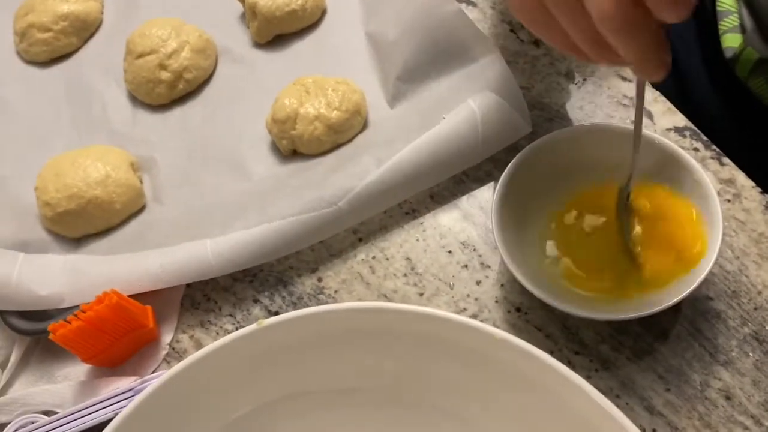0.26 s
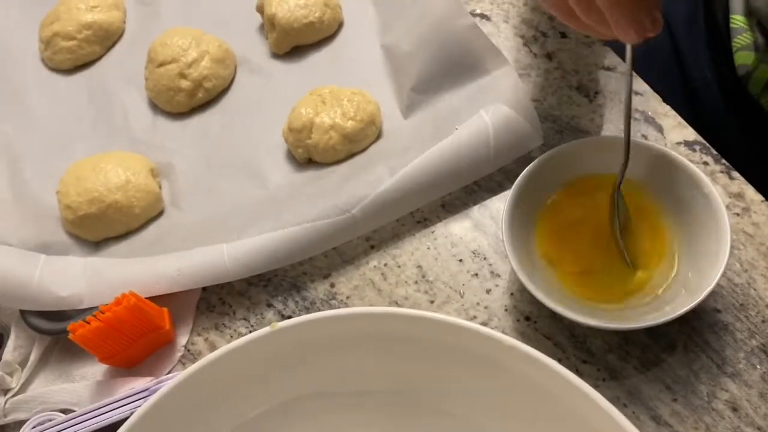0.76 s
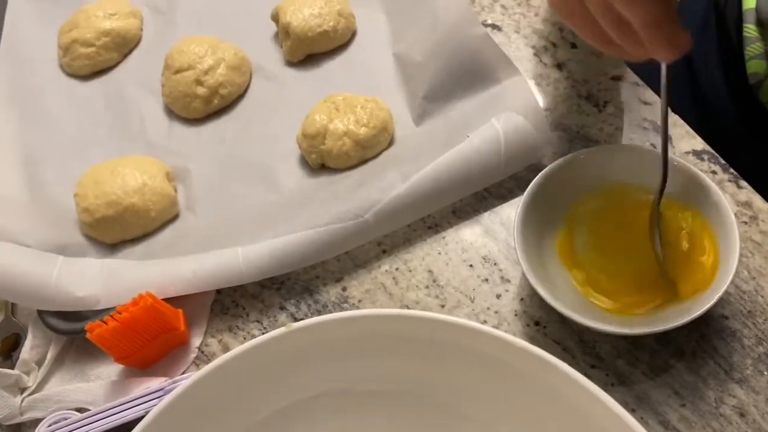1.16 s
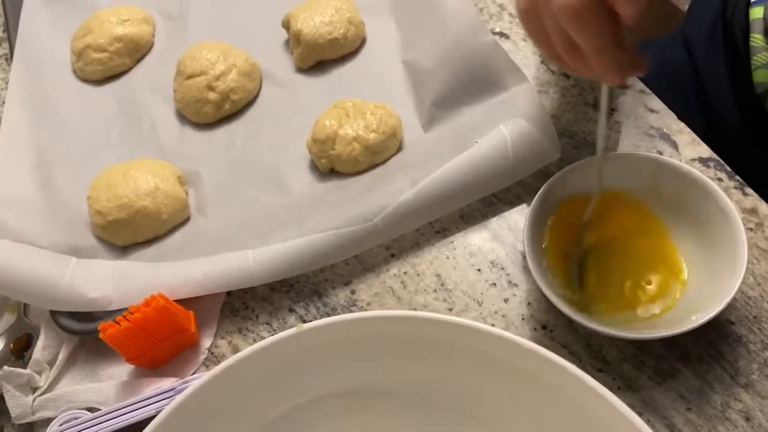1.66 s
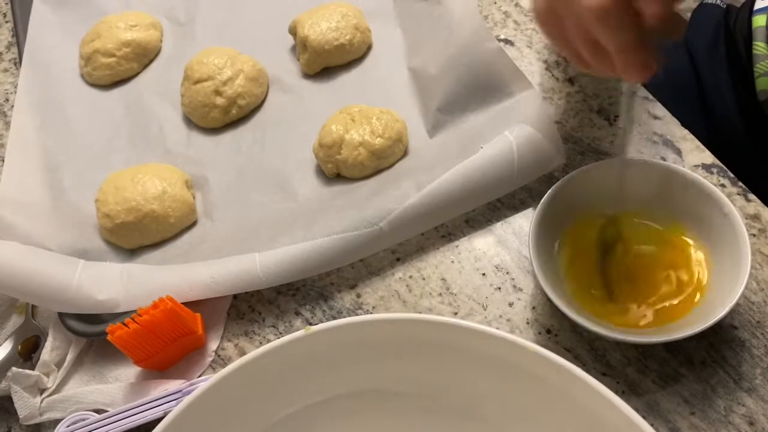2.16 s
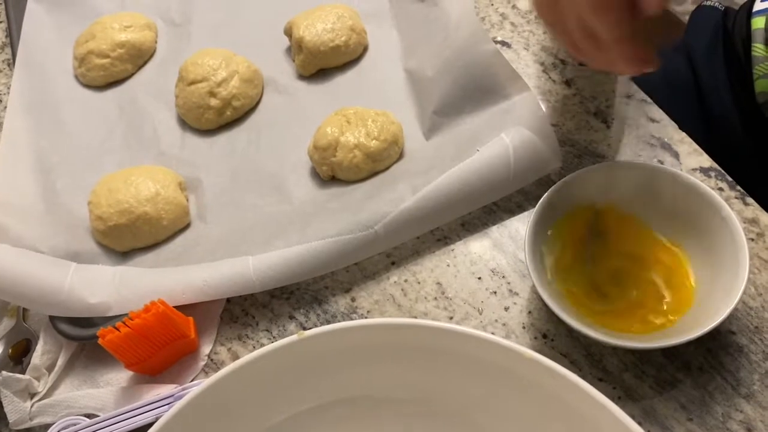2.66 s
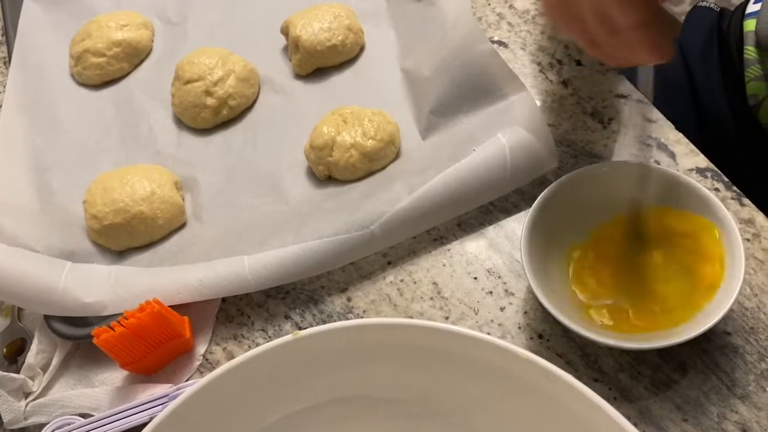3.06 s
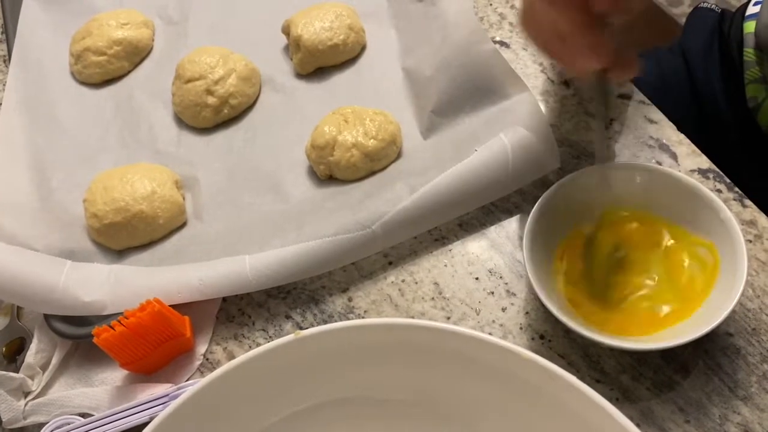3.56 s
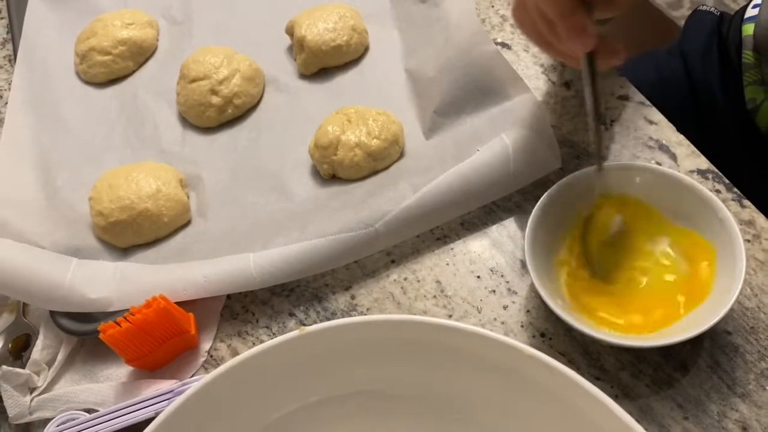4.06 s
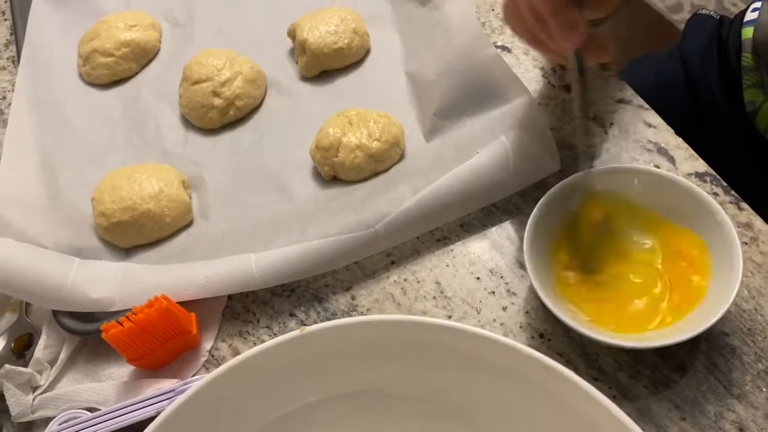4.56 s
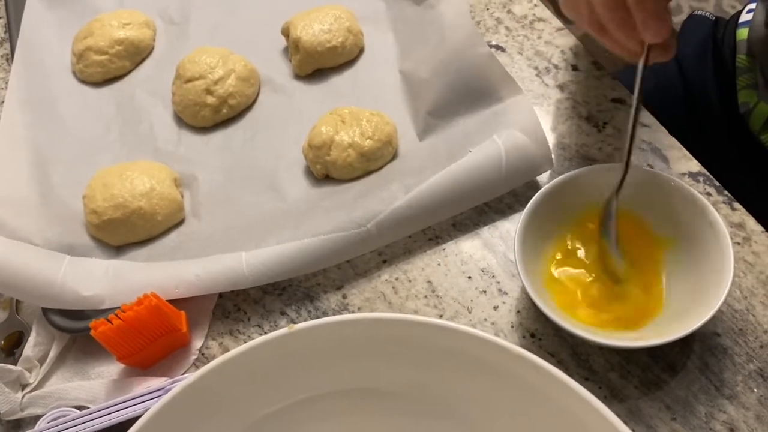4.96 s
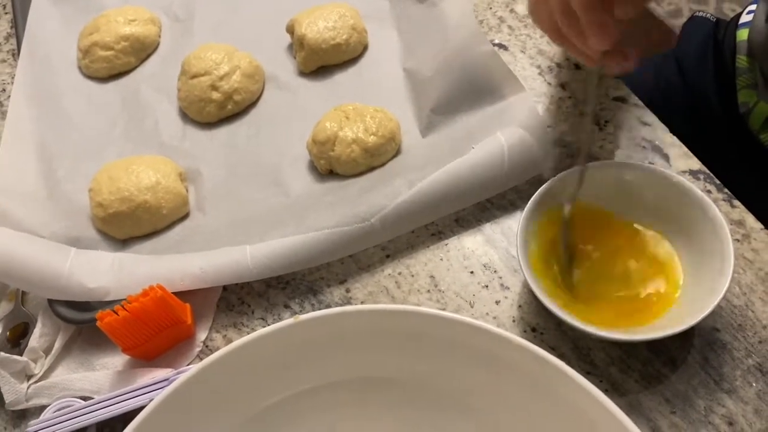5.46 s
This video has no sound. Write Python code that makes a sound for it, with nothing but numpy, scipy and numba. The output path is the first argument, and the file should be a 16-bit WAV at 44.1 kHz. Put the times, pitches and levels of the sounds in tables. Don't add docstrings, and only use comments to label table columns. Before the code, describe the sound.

A steel spoon beats egg in a small ceramic bowl, heard close on a handheld phone in a small, hard kitchen. From 0.2 s clinks fall roughly every quarter second, uneven in force: each is a dry bright crack with a short egg-damped spoon ring and a longer, fluttering bowl ring around 2 and 5 kHz. Hits near 0.8, 1.15 and 1.5 s are very loud and clip. From 1.7 s short scraping strokes join each clink; between 2.4 and 3.3 s clinks are lighter and scraping is more continuous. A firmer clink comes at 3.4 s and a sharp tiny snap at 3.6 s, then mostly soft rubbing until 4.8 s, with a moderate clink at 4.4 s. A light tap at 4.9 s precedes the hardest, overloaded clang at 5.2 s; a last clink and scrape follow at 5.55 s. Faint fridge hum, hush and deep air sway continue throughout.

```python
import sys
import numpy as np
from scipy import signal
from scipy.fft import rfft, irfft
from scipy.io import wavfile
from scipy.ndimage import uniform_filter1d
from numba import njit

SR = 44100
rng = np.random.default_rng(int(sys.argv[2]) if len(sys.argv) > 2 else 0)


def gain_from_db(level_db):
    decades = np.asarray(level_db, float) / 20
    return 10 ** decades


def persist_wave(psi):
    counts = np.round(np.clip(psi, -1, 1) * 32767).astype(np.int16)
    wavfile.write(sys.argv[1], SR, np.atleast_2d(counts).T)


N = 250929


def colour(x, points):
    hz, db = np.transpose(points)
    f = np.maximum(np.fft.rfftfreq(4096, 1 / SR), 1)
    cepstrum = irfft(np.interp(np.log(f), np.log(hz), db) * np.log(10) / 20)
    cepstrum[1:2048] *= 2
    cepstrum[2049:] = 0
    return signal.fftconvolve(x, irfft(np.exp(rfft(cepstrum))))[:len(x)]


def butter(x, order, hz, kind):
    return signal.sosfilt(signal.butter(order, hz, kind, fs=SR, output="sos"), x)


def unit(x):
    return x / np.sqrt(np.mean(x ** 2))


def walk(size):
    steps = uniform_filter1d(rng.standard_normal(2 * N // size + 2), size=2)
    return 2.36 * np.interp(np.arange(N), np.arange(len(steps)) * size / 2, steps)


@njit
def resonate(x, hz, width_hz):
    y, first, second, pole = np.empty(len(x)), 0j, 0j, 0j
    for i in range(len(x)):
        if i % 32 == 0:
            pole = np.exp(np.pi * (2j * hz[i] - width_hz) / SR)
        first = first * pole + x[i]
        second = second * pole + first
        y[i] = second.imag
    return y


def ring(hz, db, t60_s, phase=0):
    t = np.arange(SR // 2) / SR
    return gain_from_db(db) * np.sin(2 * np.pi * hz * t + phase) * np.exp(-np.log(1000) * t / t60_s)


def add(out, s, sound):
    i = int(s * SR)
    out[i:i + len(sound)] += sound[:N - i]


# f/Hz, level/dB per Hz
HUSH = [(25, -92.5), (40, -69), (65, -79.5), (100, -77.5), (200, -79.5), (400, -77.5), (800, -86.5),
        (1600, -90.5), (3200, -100), (6400, -107), (12000, -110), (15500, -111)]
# f/Hz, level/dB rms
FRIDGE = [(84, -56), (120, -55.5), (240, -65)]
# t/s, level/dB
SWAY = [(0, -24), (.3, -19), (.5, -26), (3.6, -26), (4.3, -21), (4.6, -26), (5.4, -25), (5.69, -34)]


def background():
    t, f = np.arange(N) / SR, np.maximum(np.fft.rfftfreq(N, 1 / SR), 1)
    hz, per_hz_db = np.transpose(HUSH)
    shape = gain_from_db(np.interp(np.log(f), np.log(hz), per_hz_db)) * np.sqrt(SR / 2)
    hush = irfft(rfft(rng.standard_normal(N)) * shape, N)

    waver_db = unit(uniform_filter1d(rng.standard_normal(N), 8000))
    hum = sum(gain_from_db(db + waver_db) * np.sqrt(2) * np.sin(2 * np.pi * hz * t) for hz, db in FRIDGE)

    sway = irfft(rfft(rng.standard_normal(N)) * (f > 2) / (1 + (f / 15) ** 6), N)
    sway_db = uniform_filter1d(np.interp(t, *np.transpose(SWAY)), SR // 10)
    return hush + hum + gain_from_db(sway_db) * unit(sway)


# f/Hz, t60/s
KITCHEN_T60 = [(150, 0.49), (700, 0.52), (1900, 0.3), (3500, 0.38), (7000, 0.29), (12000, 0.21),
               (15000, .08)]


def kitchen(x):
    level_db = -12
    t, tail = np.arange(SR // 2) / SR, 0
    hz, t60_s = np.transpose(KITCHEN_T60)
    for f in 100 * 2 ** np.arange(0, 7.5, .5):
        band = butter(rng.standard_normal(len(t)), 2, [f / 2 ** .25, f * 2 ** .25], "band")
        tail = tail + band * np.exp(-np.log(1000) * t / np.interp(np.log(f), np.log(hz), t60_s))
    tail *= np.clip((t - .002) / 0.002, 0, 1)
    return gain_from_db(level_db) * signal.fftconvolve(x, tail / np.sqrt(np.sum(tail ** 2)))[:N]


# t/s, f/Hz, level/dB, t60/s, start phase/turns
JOLTS = [
    (0, 7.6, -10, 1.2, -.25),
    (1.85, 40, -36, .3, 0),
]


def hand_jolts():
    out = np.zeros(N)
    for s, hz, db, t60_s, turns in JOLTS:
        add(out, s, ring(hz, db, t60_s, 2 * np.pi * turns) * np.hanning(SR)[SR // 2:])
    return out


# t/s, peak level/dB
TICKS = [
    (1.649, -16),
    (3.613, -9),
    (4.5156, -24),
    (4.579, -20.5),
    (4.618, -23),
]


def ticks():
    out, t = np.zeros(N), np.arange(400) / SR
    for s, db in TICKS:
        snap = signal.lfilter([1, -.8], 1, rng.standard_normal(400))
        add(out, s, gain_from_db(db - 20.5) * snap * np.exp(-t / 0.0014))
    return out


def drag_mode(drive, judder, hz, width_hz, db):
    catches = rng.standard_normal(N) * rng.exponential(size=N) * judder * drive
    catches *= gain_from_db(db + 2.6 * walk(size=1400))
    hz = hz * (1 + .009 * walk(size=1500))
    return resonate(catches, hz, 0.99 * width_hz) * width_hz ** 1.583 / SR


# t/s, length/s, blade pressure level/dB, tip pressure level/dB, blade f/Hz
STROKES = [(0.017, 0.08, -38, -42, 1920), (0.224, 0.053, -32.5, -67, 1790), (1.54, 0.078, -45, -65, 1960),
           (1.741, 0.071, -26, -55, 1770), (1.981, 0.048, -27.5, -47, 1810),
           (2.222, 0.059, -29.5, -54, 1756), (2.43, 0.1, -26.5, -44.5, 1865),
           (2.673, 0.11, -27.5, -49.5, 1836), (2.872, 0.031, -33, -44, 1924),
           (2.933, 0.12, -26.5, -50, 1900), (3.104, 0.046, -33, -41.5, 1830),
           (3.181, 0.12, -25, -52.5, 1830), (3.428, 0.067, -33.5, -53.5, 1766),
           (3.505, 0.11, -40.5, -52, 1865), (3.64, 0.1, -28.5, -48.5, 1843), (3.746, 0.07, -39, -67, 1740),
           (3.795, 0.094, -50, -48.5, 1760), (3.888, 0.098, -30.5, -51, 1805),
           (4.01, 0.088, -43.5, -49.5, 1850), (4.125, 0.093, -44, -61, 1904),
           (4.246, 0.099, -47.5, -49, 1850), (4.391, 0.089, -31.5, -52.5, 1750),
           (4.639, 0.13, -35, -51.5, 1810), (5.555, 0.089, -28, -56, 1680)]
# f/Hz, width/Hz, level/dB
DRAG_LOW = [(1065, 128, -13.5), (1292, 71, -17.5), (2017, 270, -16)]
DRAG_MID = [(2730, 100, -3), (3190, 170, -3), (3950, 200, -7), (4800, 250, -12), (5035, 40, -17)]
DRAG_TOP = [(6600, 140, -7), (7050, 220, -2), (7800, 200, 0), (9500, 280, -10), (10100, 280, -8),
            (11300, 220, -11), (11850, 280, -6), (12400, 350, -10), (13300, 450, -12), (14900, 500, -13)]
# t/s, f/Hz
NECK_DRY = [(0, 3870), (3.95, 3950), (4.01, 3620), (4.12, 4130), (4.24, 3430), (4.4, 3820), (4.64, 3650),
            (5.5, 3840)]


def scrape():
    neck_deep_hz, dive, dive_span = 3180, 0.722, 0.087
    press, blade_hz, neck_hz = np.zeros((3, N)), np.full(N, 1800.), np.full(N, float(neck_deep_hz))
    for s, length_s, blade_db, tip_db, hz in STROKES:
        middle_db = -26 + 0.25 * blade_db + 0.29 * tip_db
        press_db = np.array((blade_db, middle_db, tip_db))
        i, u = int(s * SR), np.arange(int(length_s * SR)) / (length_s * SR)
        press[:, i:i + len(u)] += gain_from_db(press_db)[:, None] * np.sin(np.pi * u ** 1.28) ** 0.69
        blade_hz[i:] = hz
        neck_hz[i:] = neck_deep_hz
        rise_hz = np.interp(s, *np.transpose(NECK_DRY)) - neck_deep_hz
        neck_hz[i:i + len(u)] += rise_hz / (1 + np.exp((u - dive) / dive_span))

    judder = gain_from_db(0.9 * walk(size=200))
    sound = drag_mode(press[0], judder, blade_hz, 120, 0)
    sound += drag_mode(press[0], judder, 1.07 * blade_hz, 140, -6)
    sound += drag_mode(press[0], judder, .93 * blade_hz, 120, -6)
    sound += drag_mode(press[1], judder, neck_hz, 150, 0)
    for drive, modes in zip(press, (DRAG_LOW, DRAG_MID, DRAG_TOP)):
        for hz, width_hz, db in modes:
            sound += drag_mode(drive, judder, hz, width_hz, db)
    grit = butter(rng.standard_normal(N) * judder * (press[1] + press[2]), 2, 2500, "high")
    return gain_from_db(-33.0) * sound + gain_from_db(-9.5) * grit


# f/Hz, level/dB per Hz
CRACK = [(150, -48.5), (400, -15.5), (1000, -7.5), (1800, 5), (3000, -7), (5000, -9.5), (6000, -18),
         (7800, -8), (10000, -23.5), (12500, -33.5), (14000, -35), (16000, -34)]


def crack(peak_db, rim_db):
    t = np.arange(SR // 4) / SR
    hz, db = np.transpose(CRACK)
    tilt_db_oct = -0.41 - 0.1473 * peak_db + 0.048 * rim_db
    body_db = 0.48 * rim_db * np.exp(-(np.log2(hz / 2900) / .4) ** 2)
    shape = np.transpose([hz, db + tilt_db_oct * np.log2(hz / 2000) + body_db])
    decay = np.exp(-t / 0.0071) + 0.43 * np.exp(-t / 0.00056) + 0.033 * np.exp(-t / 0.0067)
    noise = colour(rng.standard_normal(len(t)) * decay, shape)
    noise = butter(noise, 4, 230, "high")
    return gain_from_db(peak_db - 12.5) * noise / np.abs(noise).max()


def thud(peak_db):
    db = -39 + 0.81 * peak_db
    low, high = rng.standard_normal(2)
    return ring(440 + 30 * low, db, .055) + ring(670 + 40 * high, db, .055)


# f/tip f, level/dB, t60/s
TIP = [(1.0, 3.5, 0.051), (1.014, -12.5, 0.011), (.982, -7.5, 0.044), (.83, -12, 0.033), (.885, -11, 0.045),
       (.49, -15.5, 0.065), (.34, -24.5, 0.026), (.41, -31, .035), (.69, -20, .03)]
# f/Hz, level/dB, t60/s
EDGE = [(9400, 0, .035), (10050, -3, .025), (11900, -4, .03), (12450, -3, .03), (13300, -6, .02),
        (14200, -6, .02)]


def spoon(peak_db, spoon_db, rim_db, tip_hz):
    tip_db = peak_db + spoon_db
    edge_db = peak_db + max(-16 + 0.6 * spoon_db, -32.5)
    blade_db = -16.5 + 0.3 * peak_db + 0.23 * spoon_db - .05 * rim_db
    blade_hz = 1760 + 0.98 * (tip_hz - 7900) - 7 * rim_db
    sound = ring(blade_hz, blade_db + 0.5, .045)
    sound += ring(4860 + 60 * rng.standard_normal(), tip_db - 12, .05)
    for k, (multiple, db, t60_s) in enumerate(TIP):
        spot_db = (k > 0) * 3 * rng.standard_normal()
        sound += ring(multiple * tip_hz, db + tip_db + spot_db, t60_s)
    for hz, db, t60_s in EDGE:
        sound += ring(hz * (1 + 0.0038 * rng.standard_normal()), db + edge_db - 4, t60_s)
    return sound


# f/Hz, level/dB, t60/s, group (0 low, 1 middle, 2 high)
WALL = [(2043, 0, .29, 0), (2066, -15, .15, 0), (1278, -22, .2, 0), (2630, -14, .14, 0), (5032, 0, .35, 1),
        (5070, -13, .2, 1), (4900, -13, .12, 1), (7176, -1, .28, 2), (6690, -3, .3, 2), (8915, -1, .24, 2),
        (9390, -9, .2, 2), (9862, -6, .22, 2), (11530, -11, .2, 2), (13500, -18, .15, 2)]
WALL_DB = (-36, -56, -73)


def bowl_wall(peak_db, rim_db):
    group_db = np.array(WALL_DB) + np.array((1.01, 1.1535, 1.61)) * peak_db
    group_db += np.array((0.32, 1.15, 0.95)) * rim_db
    rings = np.zeros((3, SR // 2))
    for hz, db, t60_s, group in WALL:
        spot_db = (db < 0) * 2.2 * rng.standard_normal()
        rings[group] += ring(hz, db + group_db[group] + spot_db, t60_s)
    return rings


# t/s, force level/dB, spoon ring level/dB re force, height up the wall/dB of rim ring, tip f/Hz
CLINKS = [(0.2269, 2.5, -37.5, -6, 7780), (0.5412, 5, -20, -0.5, 7940), (0.8021, 19.5, -14, 4.5, 8080),
          (1.0517, -10, -13.5, 36, 7770), (1.1415, 13, -64, 14.5, 7380), (1.291, 0.5, -9.5, 0.5, 7860),
          (1.486, 15.5, -22, 12, 7810), (1.7424, 2.5, -24.5, 3.5, 7820), (1.9624, -4.5, -20.5, -1.5, 7940),
          (2.2074, 6.5, -19, -6.5, 7880), (2.4199, -10, -15, 7.5, 7960), (2.6574, -9.5, -20, 11, 7920),
          (2.8584, -8, -17, 7, 7990), (3.096, -16, -20.5, -2.5, 7910), (3.2175, -15, -30, 4, 7900),
          (3.4094, 2.5, -26, -10, 8150), (3.7626, -21, -42.5, 18, 7740), (4.3934, -5, -30.5, 4, 7930),
          (4.9055, -12, -29, 7.5, 7870), (5.2347, 23, -40.5, 16, 8200), (5.5628, 3.5, -50, -2, 7700)]
WALL_FLUTTER_DB = (1.1, 2.8, 3.2)


def clinks():
    knocks, wall = np.zeros(N), np.zeros((3, N))
    for s, peak_db, spoon_db, rim_db, tip_hz in CLINKS:
        add(knocks, s, crack(peak_db, rim_db))
        add(knocks, s, thud(peak_db))
        add(knocks, s, spoon(peak_db, spoon_db, rim_db, tip_hz))
        for group, rings in zip(wall, bowl_wall(peak_db, rim_db)):
            add(group, s, rings)
    return knocks, sum(group * gain_from_db(1.5 + db * walk(size=700)) for group, db in zip(wall, WALL_FLUTTER_DB))


def scene():
    knocks, wall = clinks()
    near = knocks + scrape() + ticks()
    echo = kitchen(near + .25 * wall)
    return (near + wall + echo + background() + hand_jolts())[None]


def band_limit(x):
    return signal.sosfilt(signal.butter(12, 20000, fs=SR, output="sos"), x)


def record(dry):
    heard = signal.sosfilt(signal.ellip(8, .2, 60, 15700, fs=SR, output="sos"), dry)
    return band_limit(np.clip(heard, -1, 1))


dry = scene()
out = record(dry)
persist_wave(out)
```